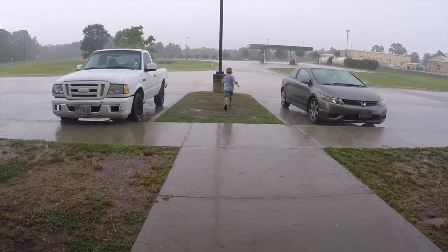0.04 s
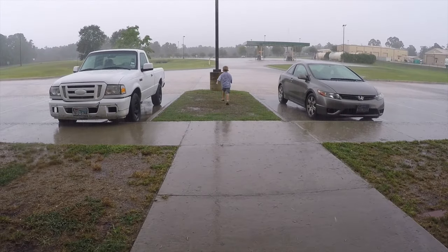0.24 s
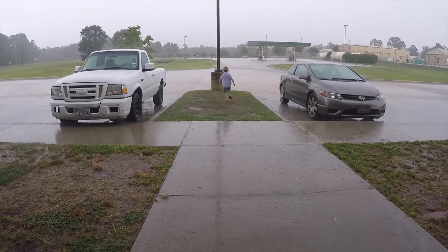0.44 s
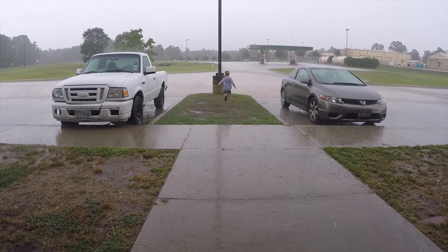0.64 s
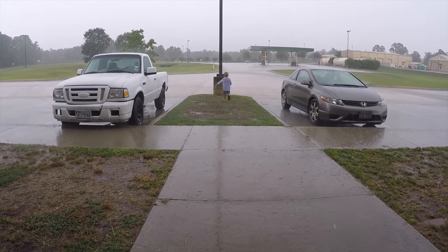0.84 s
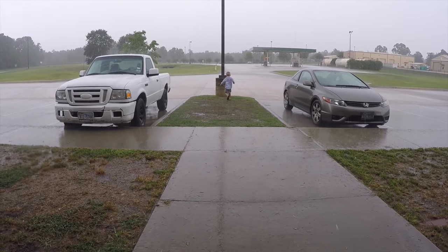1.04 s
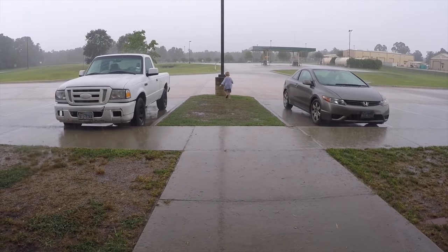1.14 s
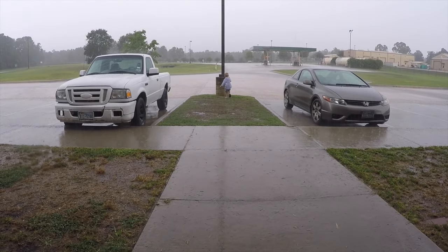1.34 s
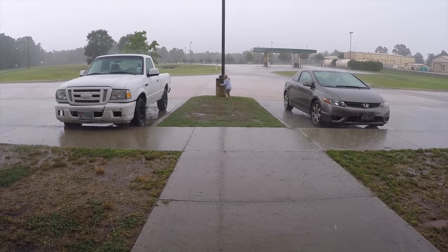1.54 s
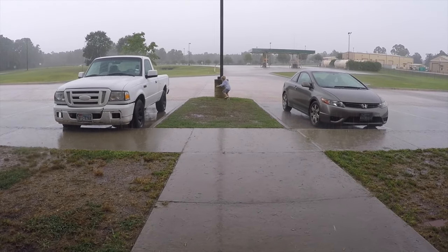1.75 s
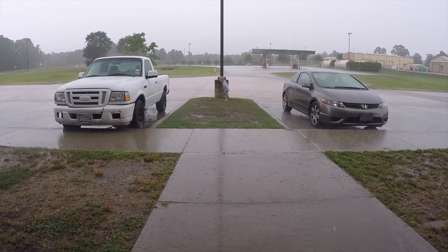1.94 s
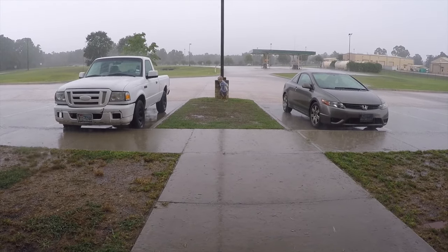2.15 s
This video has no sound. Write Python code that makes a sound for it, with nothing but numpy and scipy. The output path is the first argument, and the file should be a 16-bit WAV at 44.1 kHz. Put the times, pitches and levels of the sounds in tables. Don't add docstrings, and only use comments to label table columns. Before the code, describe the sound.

A door close to the microphone shuts: faint rubbing from 0 s, then a strong low wooden thump at about 0.18 s with a short shudder, slight rattle and pane buzz, fading by 0.35 s as a latch clicks at 0.34 s. Steady, soft, patchy rain runs throughout the two seconds, with fine nearby drops and small wet splashes from 0.4 s onward, clearest near 1.1 s. Light porch echo.

```python
import sys
import numpy as np
from scipy import signal
from scipy.fft import rfft, irfft
from scipy.io import wavfile
from scipy.ndimage import uniform_filter1d, map_coordinates

SR = 44100
rng = np.random.default_rng(int(sys.argv[2]) if len(sys.argv) > 2 else 0)


def amplitude_ratio(level_db):
    exponent = np.asarray(level_db, float) / 20
    return 10 ** exponent


def log_audio(samples):
    frames = np.atleast_2d(samples).T
    limited = np.clip(frames, -1, 1)
    pcm = np.round(limited * 32767).astype(np.int16)
    wavfile.write(sys.argv[1], SR, pcm)


N = 97020

# (time [s], strength [dB])
DOOR_BLOWS = [(0.119, -42), (0.138, -30.5), (0.159, -34.5), (0.1792, -10.5), (0.19, -20), (.212, -20.5),
              (0.241, -20.5), (0.28, -38), (.314, -46), (0.334, -34), (.425, -42), (.54, -49)]
# (frequency [Hz], level [dB], 60 dB decay [s])
LEAF_MODES = [(48, -16, .3), (64, -11.5, 0.11), (87.5, 3.5, 0.043), (109, -9.5, 0.044), (123.9, 3, .1),
              (193.4, 1.5, 0.074), (213.3, -6, 0.054), (268.4, -10, 0.062), (295, -19, 0.074),
              (345.6, -21.5, 0.12), (405, -25, 0.064), (500, -37, 0.065), (704, -41, 0.063)]
# (time [s], level [dB], centre [Hz], length [s])
LATCH_RATTLES = [(.116, -64, 1990, 0.03), (.141, -46.5, 2254, 0.00506), (.147, -50, 2340, 0.039),
                 (.146, -52, 1350, 0.014), (.15, -54, 4500, .01), (.188, -43, 3430, 0.014),
                 (.192, -46, 4920, 0.011), (.248, -56, 4900, 0.03), (.25, -62, 8400, .02),
                 (.29, -53, 2780, 0.05), (.3, -51, 5920, 0.031), (.333, -45, 2730, .02),
                 (.348, -46.5, 4360, 0.016)]
# (time [s], level [dB], centre [Hz], length [s])
STRIP_RUBS = [(0, -55.5, 2370, 0.031), (0, -61.5, 576, 0.046), (.13, -54, 1410, 0.055),
              (.12, -50, 4230, 0.069), (.18, -47, 740, .06), (.19, -47.5, 4300, .08),
              (.24, -52.5, 8100, 0.052), (.3, -53, 697, .12), (.28, -46.5, 3610, 0.098),
              (.33, -51, 6900, 0.072), (.37, -48.5, 3990, 0.19)]
# (frequency [Hz], level [dB])
PANE_TONES = [(1180, -38.5), (1228, -42.5), (1275, -51), (1385, -49.5)]
# (time [s], level [dB], centre [Hz], length [s])
RUNOFF_SPLASHES = [(.42, -50, 4500, 0.043), (.512, -48.5, 2690, 0.059), (.578, -52, 2850, .015),
                   (.658, -53.5, 4090, 0.0045), (.658, -52.5, 7400, 0.0034), (.75, -63, 11000, 0.0074),
                   (.675, -48, 3230, 0.026), (.742, -51, 3800, 0.019), (.917, -52.5, 4950, 0.0076),
                   (1.03, -53, 1990, .04), (.99, -53.5, 3270, 0.023), (1.079, -43.5, 4840, 0.023),
                   (1.08, -48, 9400, .007), (1.105, -49.5, 3780, 0.02), (1.103, -53, 9000, 0.01),
                   (1.168, -53.5, 7000, 0.0062), (1.285, -57, 3950, .012), (1.44, -52, 2990, 0.014),
                   (1.569, -50.5, 9900, .015), (1.569, -55.5, 5770, 0.014), (1.64, -56, 10800, 0.017),
                   (1.629, -51, 3820, .012), (1.7, -59, 13700, 0.01), (1.84, -56.5, 12100, .008),
                   (1.85, -53.5, 4070, 0.033), (2.023, -57, 3380, .012), (2.038, -50.5, 4400, .02),
                   (2.042, -49, 6200, .015), (2.075, -54.5, 11900, .012), (2.11, -53, 3900, 0.023)]
# (frequency [Hz], density [dB per Hz])
RAIN_SPECTRUM = [(15, -48), (25, -8.5), (219, -0.5), (336, -3.5), (607, -6.5), (1640, -13.5), (4070, -13.5),
                 (8160, -21.5), (15100, -32.5)]
# (frequency [Hz], 60 dB decay [s])
PORCH_DECAY = [(50, 0.58), (200, 0.31), (1000, 0.88), (8000, .4)]

PUSH_S = .002
PANE_S, PANE_HOLD_S, PANE_T60_S = .1795, .028, .06
BOLT_S, BOLT_HZ, BOLT_DB, BOLT_T60_S = .3412, 4314, -28.5, .03
WANDER_RAD, WANDER_HZ = .4, 200
RAIN_DB, PATCHY_DB, SWAY_DB, SWAY_HZ = -51.5, .8, .15, 8
SPRAY_DB, SPRAY_HZ = 1.9, 9000
DROPS_PER_S, DROP_DB, DROP_SCATTER_DB = 900, -64, 3.5
DROP_HZ, DROP_SPREAD, DROP_CYCLES = 4500, 0.52, 0.83
BURST_FADE_DB = 6
PORCH_DB, METAL_SEND_DB = -11, -9
MIC_LOW_HZ = 42


def door_leaf():
    t = np.arange(N) / SR
    hz, level_db, t60 = (column[:, None] for column in np.transpose(LEAF_MODES))
    vary_db = 2.96 * rng.standard_normal((len(DOOR_BLOWS), len(LEAF_MODES), 1))
    out = np.zeros(N)
    for (start, strength_db), vary in zip(DOOR_BLOWS, vary_db):
        since = np.maximum(t - start, 0)
        modes = amplitude_ratio(level_db + vary - 60 * since / t60) * np.sin(2 * np.pi * hz * since)
        push = (1 - np.exp(-since / PUSH_S)) ** 2
        out += amplitude_ratio(strength_db) * push * modes.sum(0)
    return out


def latch_rattle():
    return bursts(LATCH_RATTLES, spread=.09, cycles=10)


def weather_strip():
    return bursts(STRIP_RUBS, spread=.45, cycles=5, count=250)


def pane_buzz():
    since = np.maximum(np.arange(N) / SR - PANE_S, 0)
    decay = amplitude_ratio(-60 * np.maximum(since - PANE_HOLD_S, 0) / PANE_T60_S)
    envelope = decay * (1 - np.exp(-since / .002))
    wander = phase_wander()
    return envelope * sum(amplitude_ratio(db) * np.sin(2 * np.pi * hz * since + wander) for hz, db in PANE_TONES)


def latch_bolt():
    since = np.maximum(np.arange(N) / SR - BOLT_S, 0)
    envelope = amplitude_ratio(BOLT_DB - 60 * since / BOLT_T60_S) * (1 - np.exp(-since / .001))
    return envelope * np.sin(2 * np.pi * BOLT_HZ * since + phase_wander())


def runoff():
    return bursts(RUNOFF_SPLASHES, spread=.13, cycles=9)


def near_drops():
    count = int(DROPS_PER_S * N / SR)
    hz = DROP_HZ * np.exp(DROP_SPREAD * rng.standard_normal(count))
    gain = amplitude_ratio(DROP_DB + DROP_SCATTER_DB * rng.exponential(size=count))
    return grains(rng.random(count) * N / SR, hz, gain, DROP_CYCLES)


def rain_wash():
    hz, _, z = signal.stft(rng.standard_normal(N + 512), SR, nperseg=512)
    patches = unit(smooth_field(z.shape, 8, 10))
    spray = unit(smooth_field(z.shape, 50, 8))
    spray_db = SPRAY_DB * spray * np.tanh(hz / SPRAY_HZ)[:, None] ** 2
    wash = signal.istft(z * amplitude_ratio(PATCHY_DB * patches + spray_db), nperseg=512)[1][:N]
    colour = amplitude_ratio(along(RAIN_SPECTRUM, np.fft.rfftfreq(N, 1 / SR)))
    wash = unit(irfft(rfft(wash) * colour, N))
    sway = map_coordinates(rng.standard_normal(30), [np.arange(N) * SWAY_HZ / SR])
    return amplitude_ratio(RAIN_DB + SWAY_DB * sway) * wash


def porch(x):
    hz, t, z = signal.stft(rng.standard_normal(SR), SR, nperseg=1024)
    decay = amplitude_ratio(-60 * t / along(PORCH_DECAY, hz)[:, None])
    tail = signal.istft(z * decay, SR, nperseg=1024)[1]
    delayed = np.pad(x, (400, 0))
    return signal.fftconvolve(delayed, tail / np.linalg.norm(tail))[:N]


def bursts(rows, spread, cycles, count=36):
    start, db, hz, length = (column[:, None] for column in np.transpose(rows))
    shape = (len(rows), count)
    when = rng.random(shape)
    pitch, size = rng.standard_normal((2, *shape))
    times = start + length * when ** 1.3
    pitches = hz * np.exp(spread * pitch)
    gain = amplitude_ratio(db - 4 - BURST_FADE_DB * when + 2 * size)
    return grains(times.ravel(), pitches.ravel(), gain.ravel(), cycles)


def grains(start, hz, gain, cycles):
    k = np.arange(200)
    turns = np.clip(hz, 200, 15000)[:, None] * k / SR
    life = turns * 3 / cycles
    swell = np.e * life * np.exp(-life)
    wave = gain[:, None] * np.sin(2 * np.pi * turns) * swell
    at = np.clip((start * SR).astype(int)[:, None] + k, 0, N)
    return np.bincount(at.ravel(), wave.ravel(), N + 1)[:N]


def phase_wander():
    return WANDER_RAD * map_coordinates(rng.standard_normal(500), [np.arange(N) / SR * WANDER_HZ])


def smooth_field(shape, bins, frames):
    field = uniform_filter1d(rng.standard_normal(shape), bins, 0)
    return uniform_filter1d(field, frames, 1)


def unit(x):
    return x / np.sqrt(np.mean(x ** 2) + 1e-20)


def along(points, hz):
    f, value = np.transpose(points)
    return np.interp(np.log(hz + 1), np.log(f + 1), value)


def scene():
    near = door_leaf() + latch_rattle() + weather_strip() + runoff()
    metal = pane_buzz() + latch_bolt()
    echo = porch(near + amplitude_ratio(METAL_SEND_DB) * metal)
    rain = rain_wash() + near_drops()
    return (near + metal + amplitude_ratio(PORCH_DB) * echo + rain)[None]


def roll_off(x):
    return signal.sosfilt(signal.butter(12, 15270, fs=SR, output="sos"), x)


def record(dry):
    low_cut = signal.butter(4, MIC_LOW_HZ, "high", fs=SR, output="sos")
    mix = signal.sosfilt(low_cut, dry)
    return roll_off(mix)


dry = scene()
out = record(dry)
log_audio(out)
```